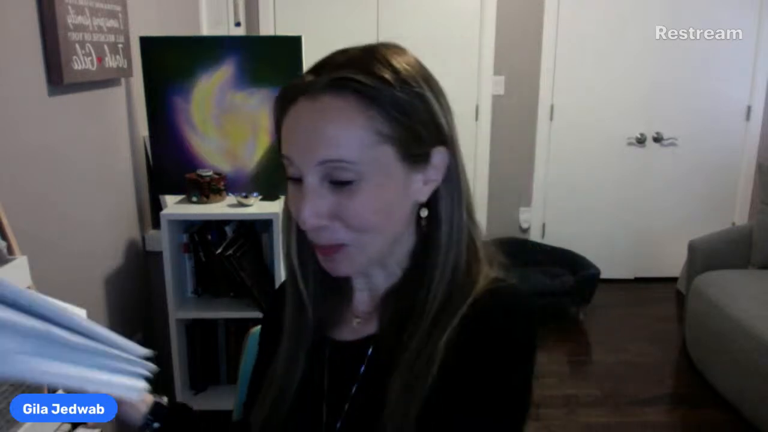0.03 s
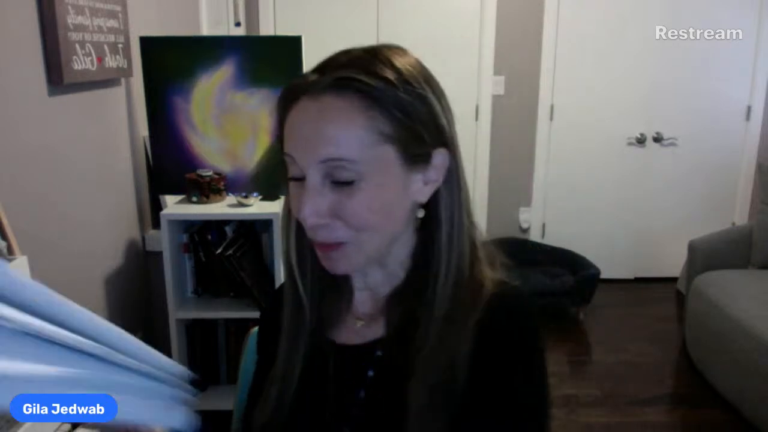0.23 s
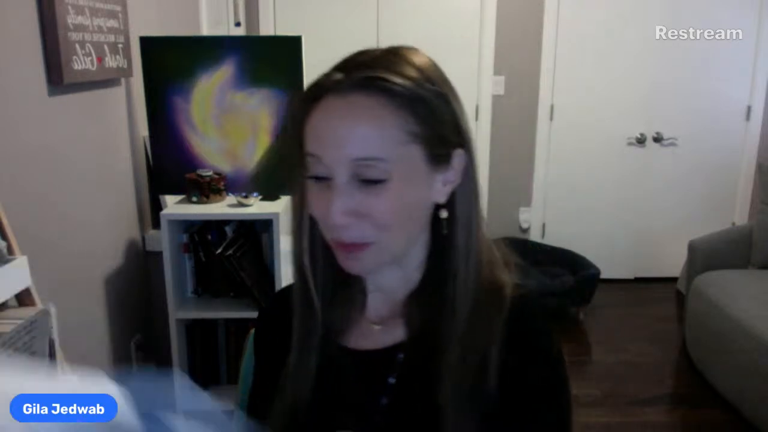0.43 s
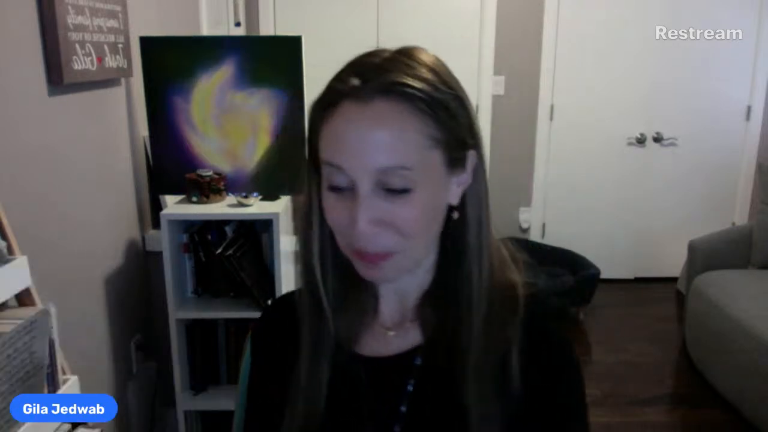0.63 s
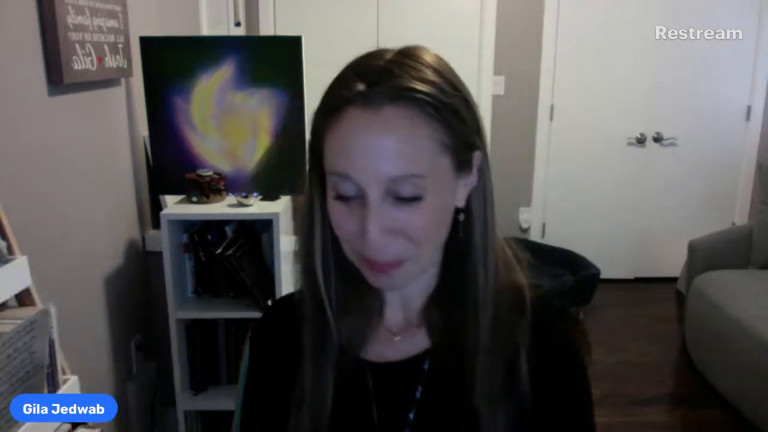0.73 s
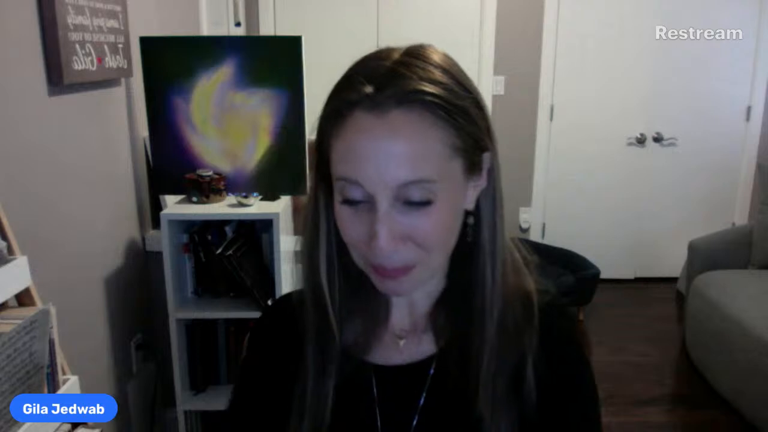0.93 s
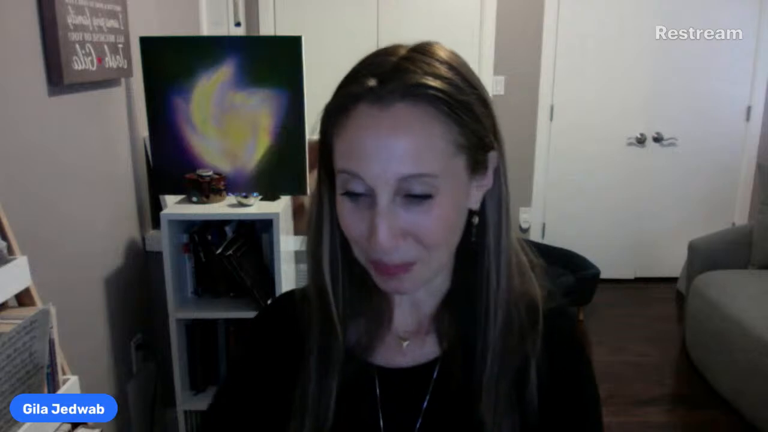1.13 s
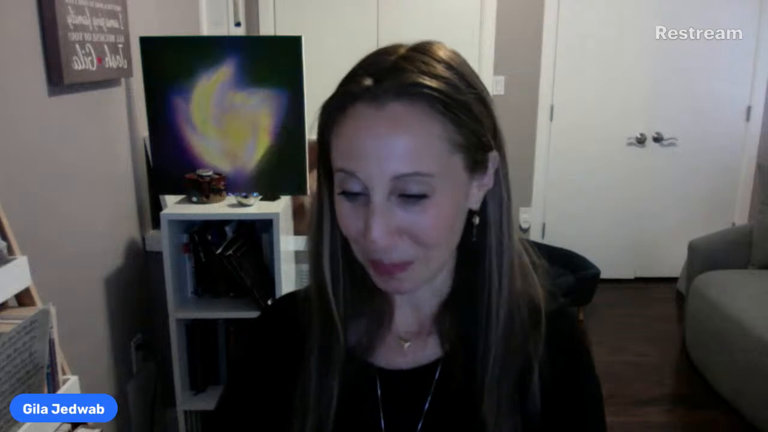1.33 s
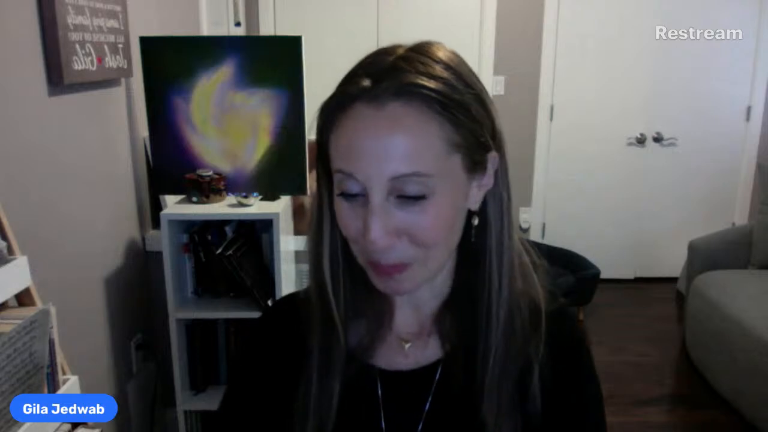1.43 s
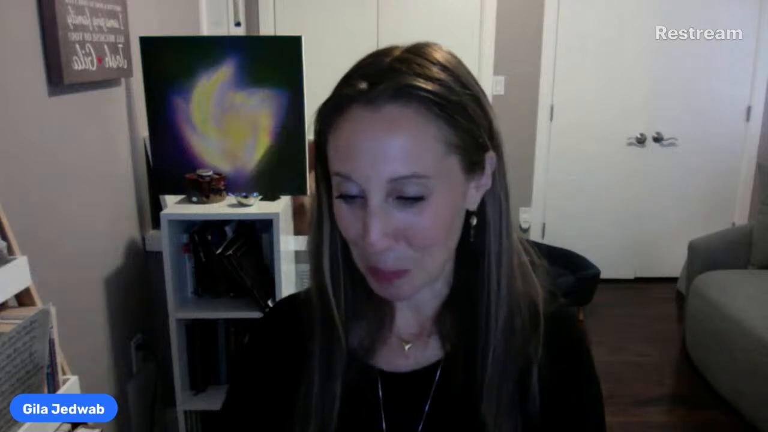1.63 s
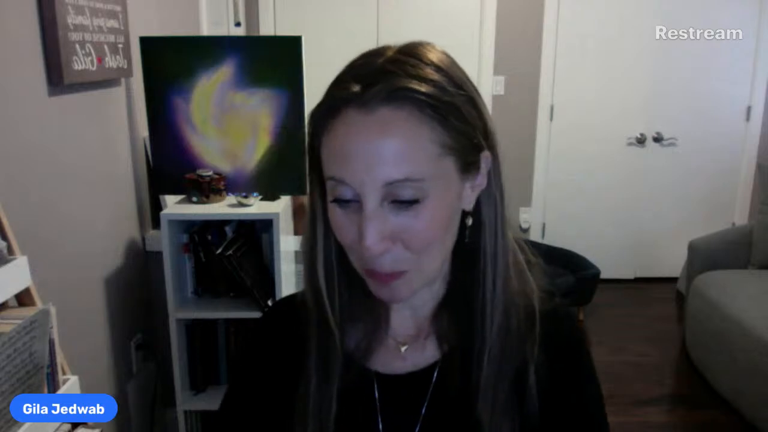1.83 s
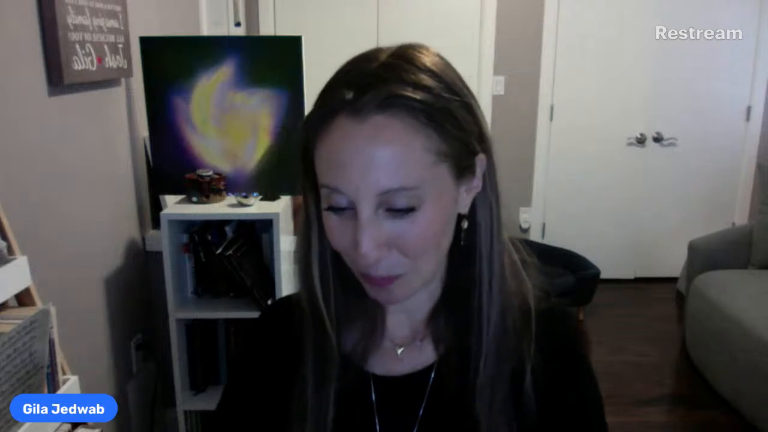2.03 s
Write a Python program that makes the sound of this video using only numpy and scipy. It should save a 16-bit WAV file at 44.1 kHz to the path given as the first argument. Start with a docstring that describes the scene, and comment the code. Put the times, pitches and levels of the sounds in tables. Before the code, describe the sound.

Paper being handled on a desk, heard close. At about 0.1 s a sheaf slaps down with a loud sharp crack and short woody thud. After a brief lull, a hollow knock at 0.5 s, then crisp snaps and rustling from 0.6 to 1.0 s. Sliding swells from 1.1 s into a second, duller slap at 1.3 s. Small crackles follow until 1.75 s, leaving faint room hum.

```python
"""A hand leafs through a sheaf of paper on a desk: the sliding sheets are crackling friction noise.
Twice the sheaf slaps down in a quick run of blows, whose push and rebound excite the desk's modes.
Snapping folds and low thumps are short wavelets, creases are crack trains ringing a patch of sheet.
A thumb knocks the pile, a hollow set of modes; a furnished room adds its hum and a short reverberation.
A nearby microphone picks it all up."""
import sys
import numpy as np
from scipy import signal
from scipy.io import wavfile
from scipy.ndimage import uniform_filter1d

SR = 44100
rng = np.random.default_rng(int(sys.argv[2]) if len(sys.argv) > 2 else 0)


def boost_factor(decibels):
    """Convert a level in decibels to a linear amplitude factor."""
    exponent = np.asarray(decibels, float) / 20
    return 10 ** exponent


def output_pcm(signal):
    """Save a mono or channel-first signal as 16-bit PCM at the path in sys.argv[1].

    Samples are clipped to [-1, 1] before scaling.
    """
    pcm = np.clip(np.atleast_2d(signal).T, -1, 1) * 32767
    wavfile.write(sys.argv[1], SR, np.round(pcm).astype(np.int16))


N = 92257  # length in samples


def evened(x):
    """Normalisation: scales a signal to unit rms."""
    return x / np.sqrt(np.mean(x ** 2) + 1e-20)


def read(points, hz):
    """Interpolation of a (f/Hz, value) curve on a logarithmic frequency axis."""
    f, value = np.transpose(points)
    return np.interp(np.log(hz + 1), np.log(f + 1), value)


def add(mix, s, sound):
    """Superposition: adds a sound to the mix from s seconds on."""
    part = mix[round(s * SR):][:len(sound)]
    part += sound[:len(part)]


def low_cut(x, hz):
    """Second-order high-pass: attenuates what lies below hz."""
    return signal.sosfilt(signal.butter(2, hz, "high", fs=SR, output="sos"), x)


def colour(x, points):
    """Minimum-phase filtering: the Hilbert transform of the log gain gives a causal response."""
    hz = abs(np.fft.fftfreq(4096, 1 / SR))
    log_gain = np.log(boost_factor(np.maximum(read(points, hz), -90)))
    spectrum = np.exp(np.conj(signal.hilbert(log_gain)))
    taps = np.fft.ifft(spectrum).real[:2048]
    return signal.oaconvolve(x, taps / np.linalg.norm(taps))[:len(x)]


def crackle():
    """Impulsive noise: clumped tiny cracks of random size over a hiss."""
    cracks_per_s, spread_db, hiss_share = 6000, 3.8, 0.42
    clump_db, clump_s = 1.9, 0.006
    struck = rng.random(N) < cracks_per_s / SR
    size = boost_factor(spread_db * np.minimum(rng.exponential(1, N), 5)) * struck
    cracks = evened(size * rng.choice([-1., 1.], N))
    x = (1 - hiss_share) * cracks + hiss_share * rng.standard_normal(N)
    width = round(clump_s * SR)
    clumps = uniform_filter1d(uniform_filter1d(rng.standard_normal(N), width), width)
    return evened(x * boost_factor(clump_db * evened(clumps)))


def patchy(x):
    """Time-varying filtering: the colour changes in random patches as other parts of the sheet bend."""
    patch_db, patch_hz, patch_s = 2.5, 500, 0.012
    z = signal.stft(x, nperseg=256, noverlap=192)[2]
    bins = max(1, round(patch_hz * 256 / SR))
    frames = max(1, round(patch_s * SR / 64))
    field = rng.standard_normal(z.shape)
    for _ in range(2):
        field = uniform_filter1d(uniform_filter1d(field, bins, 0), frames, 1)
    shaded = z * boost_factor(patch_db * evened(field))
    return evened(signal.istft(shaded, nperseg=256, noverlap=192)[1][:len(x)])


def sliding():
    """Friction and bending: rubbing fizz and the duller rattle of flexing follow the hand."""
    # motion of the hand: t/s, rubbing level/dB, flexing relative to rubbing/dB
    strokes = [(0, -57, -16), (0.051, -61.5, -23), (0.073, -60, -12), (.083, -30, 2), (.096, -46, 8),
               (0.165, -50.5, -1.5), (.216, -70.5, 15.5), (.3, -89, -2), (0.451, -92, -6.5),
               (0.464, -57.5, -15), (.478, -47, -12.5), (.522, -52.5, -9.5), (.538, -61, -5.5),
               (.594, -84, -5), (.604, -74, -5), (0.609, -47, -4), (0.617, -35, -4.5), (0.625, -53, 7.5),
               (.646, -64, 7.5), (.656, -71.5, 19.5), (0.675, -58, -10.5), (0.704, -53, 6.5),
               (0.712, -48, 8.5), (0.715, -40, -2.5), (.74, -52, 1.5), (0.755, -45, -7),
               (.762, -36.5, -4.5), (.776, -42, -0.5), (0.785, -43, -1), (0.788, -25.5, -7), (.8, -29, -6),
               (.806, -47, 0.5), (.811, -34, -8), (0.829, -40.5, -9), (0.83, -28, -18.5),
               (.842, -26.5, -14), (0.846, -36.5, -12), (.868, -36.5, -12), (.888, -46.5, -5.5),
               (.912, -34.5, -26), (0.934, -39, -16), (.95, -48.5, -12.5), (.976, -60.5, -6),
               (.994, -66.5, 4), (1.026, -50.5, -31), (1.075, -56, -17), (1.138, -43, -26),
               (1.18, -37, -15.5), (1.19, -32, -17), (1.226, -30.5, -15.5), (1.236, -26.5, -16.5),
               (1.29, -29.5, -14), (1.313, -31, -9.5), (1.318, -25.5, 0), (1.337, -24, -8.5),
               (1.446, -45, -6), (1.46, -46, -2.5), (1.518, -46, -15), (1.56, -64.5, 4.5), (1.589, -56, 13),
               (1.594, -47.5, 4), (1.601, -47, 4.5), (1.61, -33.5, -1), (1.624, -47, 0), (1.626, -52.5, 5),
               (1.635, -51, -2.5), (1.658, -78.5, 15.5), (1.678, -55.5, 2), (1.71, -57, 1),
               (1.719, -42.5, -10.5), (1.745, -44, -7.5), (1.751, -52, -3), (1.919, -100, 15.5)]
    # spectrum of an edge rubbing on a face: f/Hz, level/dB
    rub_spectrum = [(1500, -34), (2300, -25.5), (4700, -21.5), (6500, -13), (8200, -10.5), (9000, -3.5),
                    (11000, 0), (14000, -4), (15600, -3.5), (15950, -43)]
    # spectrum of the bending sheet: f/Hz, level/dB
    flex_spectrum = [(400, -36), (900, -4), (1700, -4), (2300, 8), (3300, 5), (4600, 5.5), (6000, -6),
                     (9000, -13)]
    t = np.arange(N) / SR
    rub = patchy(colour(crackle(), rub_spectrum))
    flex = patchy(colour(crackle(), flex_spectrum))
    s, rub_db, flex_db = np.transpose(strokes)
    level = boost_factor(np.interp(t, s, rub_db, right=-120))
    return level * (rub + boost_factor(np.interp(t, s, flex_db)) * flex)


def air():
    """Stationary noise under a changing level: coloured room hum with narrow-band, fuzzy tones."""
    # spectrum of the hum: f/Hz, level/dB
    hum_spectrum = [(30, -28), (70, -28.5), (100, -17.5), (140, -10), (200, -11.5), (310, 2.5), (400, -8.5),
                    (700, -5), (1100, -20.5), (1700, -17), (2400, -17.5), (4000, -24), (7000, -29.5),
                    (16000, -29.5)]
    # course of the hum: t/s, level/dB
    hum_level = [(0, -55), (.3, -61), (.42, -79), (.5, -64.5), (1.0, -65), (1.3, -63.5), (1.8, -66.5),
                 (1.951, -76.5), (2.09, -75)]
    # faint tones: f/Hz, bandwidth/Hz, level against the hum/dB
    whines = [(1690, 110, -12.5), (2300, 74, -12.5), (3600, 120, -15.5)]
    s, db = np.transpose(hum_level)
    hum = colour(rng.standard_normal(N), hum_spectrum)
    for hz, width_hz, tone_db in whines:
        b, a = signal.iirpeak(hz, hz / width_hz, SR)
        tone = evened(signal.lfilter(b, a, rng.standard_normal(N)))
        hum = hum + boost_factor(tone_db) * tone
    return boost_factor(np.interp(np.arange(N) / SR, s, db)) * hum


def room(x):
    """Reverberation: sparse taps of random sign, each band decaying with its own t60."""
    # decay of the room: f/Hz, t60/s
    decay = [(100, 0.25), (400, 0.23), (800, 0.34), (1500, 0.36), (4000, 0.093), (10000, 0.23)]
    delay_s, spacing = 0.0054, 20  # one tap in every 20 samples
    taps = np.zeros(SR // 2)
    at = np.arange(round(delay_s * SR), SR // 2 - spacing, spacing)
    taps[at + rng.integers(0, spacing, len(at))] = rng.choice([-1., 1.], len(at))
    hz, t, z = signal.stft(taps, SR, nperseg=256)
    damped = z * boost_factor(-60 * t / read(decay, hz)[:, None])
    tail = signal.istft(damped, SR, nperseg=256)[1]
    return signal.fftconvolve(x, tail / np.linalg.norm(tail))[:N]


def ring(modes, seconds, waver=0):
    """Modal synthesis: decaying sines, their amplitudes modulated by slow noise of rms depth waver."""
    t = np.arange(round(seconds * SR)) / SR
    noise = rng.standard_normal((len(modes), len(t)))
    slow = uniform_filter1d(noise, 900, axis=1) * 30  # back to about unit rms
    out = np.zeros(len(t))
    for (hz, db, t60), w in zip(modes, slow):
        out += boost_factor(db - 60 * t / t60) * (1 + waver * w) * np.sin(2 * np.pi * hz * t)
    return out


def slaps():
    """Impact excitation: a noise burst as sheets land; push and rebound ring the desk modes."""
    # blows of the sheaf on the desk: t/s, crack level/dB, thud level/dB, crack decay time/s
    blows = [(0.075, -40.5, -44, 0.012), (0.0832, -16.5, -18.5, 0.0086), (0.091, -27.5, -14.5, 0.018),
             (0.119, -25, -17, 0.025), (.134, -39.5, -10.5, 0.019), (1.3153, -28, -29, 0.025),
             (1.328, -17.5, -16.5, 0.0057), (1.34, -30, -18, 0.0067), (1.361, -28, -27, 0.02)]
    # spectrum of the crack: f/Hz, level/dB
    crack_spectrum = [(100, -29.5), (250, -9), (500, 10.5), (850, 7), (1500, 4), (2200, 4.5), (3400, -6),
                      (4500, -9), (6500, -17), (9500, -13.5), (15600, -18.5), (16000, -40.5)]
    # modes of the desk: f/Hz, level/dB, t60/s
    desk = [(130, -13, 0.24), (144.45, -8, 0.25), (190, -13, .15), (262, -8, .13), (308.4, -9.5, 0.12),
            (321.7, -9, 0.16), (427, -15.5, 0.19), (553.5, -12.5, 0.23), (638, -16, 0.33), (735, -17, 0.23),
            (854, -18, 0.18), (975, -22.5, 0.11), (1110, -19, .15), (1300, -20.5, .12)]
    thud_s, spill_cut_hz = 0.0012, 101
    crack, push, t = np.zeros(N), np.zeros(N), np.arange(3000) / SR
    bursts = crackle()[:len(blows) * 3000].reshape(len(blows), 3000)
    pulse = (1 - t / thud_s) * np.exp(-t / thud_s) / (thud_s * SR)
    for (s, crack_db, thud_db, length), burst in zip(blows, bursts):
        add(crack, s, boost_factor(crack_db) * burst * np.exp(-t / length))
        add(push, s, boost_factor(thud_db) * pulse)
    boom = signal.oaconvolve(push, ring(desk, .6, waver=1.0))[:N]
    # the low cut removes the low-frequency spill of the abruptly starting sines
    return colour(crack, crack_spectrum) + low_cut(boom, spill_cut_hz)


def pops(rows):
    """Damped oscillation: a few cycles swell at once and die; the envelope peaks after cycles / 3."""
    out, t = np.zeros(N), np.arange(5000) / SR
    for s, db, hz, cycles in rows:
        u = t * hz / cycles * 3
        add(out, s, boost_factor(db) * np.e * u * np.exp(-u) * np.sin(2 * np.pi * hz * t))
    return out


def snaps():
    """Sudden release: each snapping fold rings for a few cycles."""
    # snapping folds: t/s, envelope peak level/dB, f/Hz, cycles of ringing
    folds = [(0.0826, -0.5, 1876, 0.9), (0.0831, -13.5, 3466, 1.2), (0.0835, -10.5, 4900, 3.4),
             (0.0826, -7.5, 9420, 2.5), (0.082, -17, 14000, 2.5), (0.0884, -20, 2990, 1.5),
             (1.3309, -16.5, 1310, 1.85), (0.6037, -28.5, 12900, 4.5), (0.7052, -10, 2250, 2.8),
             (0.7054, -23.5, 1380, 2.2), (0.7044, -27, 3400, 2), (0.79, -17.5, 11100, 2),
             (0.8341, -19.5, 12040, 3), (0.7046, -24, 4600, 4.5), (0.7146, -20, 2300, 3.3),
             (1.3142, -19.5, 2030, 11), (1.32, -20.5, 2610, 1.9), (1.607, -26, 9100, 7.5),
             (1.612, -26, 9470, 6.1), (0.913, -22, 11000, 4.6), (.9875, -47, 2360, 3.4),
             (1.158, -40, 1500, 1.4), (1.2387, -10, 10660, 1.2), (1.2378, -27.5, 3600, 2.2),
             (1.244, -19, 10400, 1.7), (1.329, -13, 1900, 1.8), (1.464, -31.5, 4600, 5.1),
             (1.6076, -19, 2900, 1.1), (1.608, -28, 4800, 2.9), (1.6126, -25, 2600, 2.7),
             (1.686, -46, 1780, 1.3), (1.7184, -21, 9200, 6.1), (1.7178, -32.5, 15540, 3.5)]
    return pops(folds)


def thumps():
    """Damped low cycles under the slaps: squeezed air and the short, dull body of the second slap."""
    # low thumps: t/s, envelope peak level/dB, f/Hz, cycles
    low_bodies = [(.085, -34, 75, 1.5), (1.341, -19, 128, 2.6), (1.33, -31, 70, 1.8), (1.329, -22, 265, 6)]
    return pops(low_bodies)


def crunches():
    """Resonant filtering: a short run of cracks rings one patch of a creasing sheet."""
    # creases: t/s, level/dB, centre f/Hz, length of the run/s
    creases = [(0.467, -58, 4800, 0.059), (0.472, -43, 11600, 0.023), (0.534, -54.5, 1730, 0.02),
               (.608, -33.5, 4700, 0.02), (.607, -42, 2340, 0.022), (0.611, -37.5, 2200, 0.012),
               (0.614, -37, 5600, 0.012), (0.706, -29, 2500, 0.011), (0.78, -34, 4300, 0.01),
               (0.722, -38.5, 2670, 0.025), (0.783, -36.5, 4640, 0.023), (0.62, -41, 2000, 0.01),
               (0.827, -39, 2180, 0.031), (0.78, -40, 2410, 0.023), (.466, -52, 12000, 0.015),
               (0.654, -55, 4800, 0.046), (0.86, -44, 4400, 0.016), (0.752, -39, 2540, 0.024),
               (0.833, -37, 2600, 0.014), (0.812, -44.5, 5100, 0.021), (0.896, -51.5, 2290, 0.047),
               (0.893, -48, 4700, 0.05), (1.191, -45.5, 2000, 0.005), (1.466, -53.5, 2300, 0.043),
               (1.3142, -31, 2080, 0.015), (1.3145, -34, 4200, 0.009), (1.355, -33, 5200, 0.0218),
               (1.574, -51, 1870, 0.07), (1.582, -46, 3000, .055), (1.59, -49, 1400, 0.053),
               (1.628, -48, 2260, 0.052), (1.729, -45.5, 3310, 0.031), (2.015, -80, 4800, 0.053)]
    damping = 0.22  # decay bandwidth as a share of the centre frequency
    out, grit, t = np.zeros(N), crackle(), np.arange(800) / SR
    for s, db, hz, length in creases:
        u = np.arange(round(length * SR)) / (length * SR)
        patch = t * np.exp(-np.pi * damping * hz * t) * np.sin(2 * np.pi * hz * t)
        run = grit[round(s * SR):][:len(u)] * np.sin(np.pi * u ** 0.35)  # rises fast, fades slowly
        add(out, s, boost_factor(db) * np.convolve(run, patch / np.linalg.norm(patch)))
    return out


def knocks():
    """Modal ringing with a pitch glide: the pile sounds hollow and falls in pitch as it settles."""
    # knocks of the thumb: t/s, level/dB, starting pitch as a ratio to the pile at rest
    touches = [(.475, -34, 1.08), (.4835, -14.5, 1.027), (.499, -28, 1.16), (.506, -24.5, 0.88),
               (.539, -26.5, 0.97), (.57, -46, 0.62), (.7042, -17.5, 0.92), (.722, -30, 0.68),
               (.762, -39, 0.66), (.79, -31, 1.1), (.832, -35, .95), (1.238, -36.5, 0.83),
               (1.588, -37, 1.03), (1.6, -39, 1.06), (1.65, -46, 1.19), (1.685, -37.5, 1.07),
               (1.76, -43.5, 0.93)]
    # modes of the pile at rest: f/Hz, level/dB, t60/s
    pile = [(546, -20.5, 0.12), (591, 0.5, 0.04), (738.6, 10.5, 0.044), (791.4, -7, 0.15), (947, -6, 0.057),
            (1202, -5.5, 0.055)]
    rise_s, sag_per_s = 0.0011, 0.99  # sag: share of the starting pitch lost per second
    hollow = ring(pile, .2)
    out, t = np.zeros(N), np.arange(round(.12 * SR)) / SR
    rise = (1 - np.exp(-t / rise_s)) ** 2
    for s, db, pitch in touches:
        warped = pitch * (t - sag_per_s * t ** 2 / 2)
        bent = np.interp(warped, np.arange(len(hollow)) / SR, hollow)
        add(out, s, boost_factor(db) * rise * bent / abs(hollow).max())
    return out


def scene():
    """Superposition of direct sound, reverberation and room hum."""
    paper = low_cut(knocks() + snaps() + crunches(), 400)  # thin paper radiates little bass
    blows = slaps() + thumps() + paper
    sheets = sliding()
    reverberation = room(blows + boost_factor(-23.5) * sheets)  # the sliding excites the room far less
    return (blows + sheets + boost_factor(-12.5) * reverberation + air())[None]


def roll_off(x):
    """The treble ends steeply here."""
    return signal.sosfilt(signal.butter(12, 16820, fs=SR, output="sos"), x)


def record(dry):
    """Band limitation: the low cut of the microphone, then the upper band limit of the link."""
    x = low_cut(dry, 70)
    band_limit = signal.firwin(255, 16700, window=("kaiser", 7), fs=SR)
    x = signal.oaconvolve(x, band_limit[None], "same")
    return roll_off(x)


dry = scene()
out = record(dry)
output_pcm(out)
```